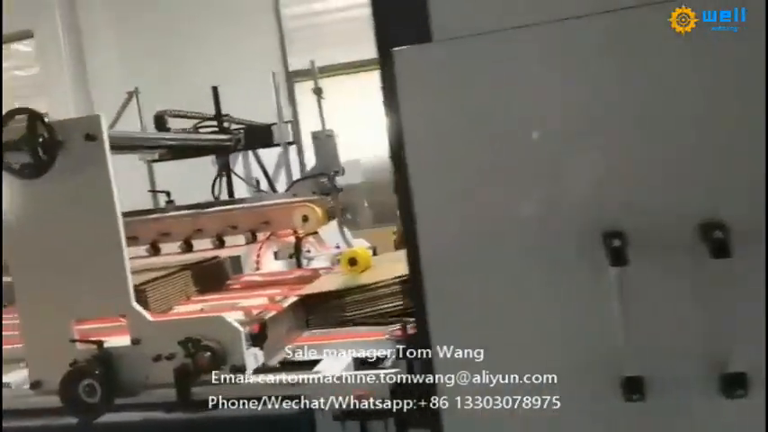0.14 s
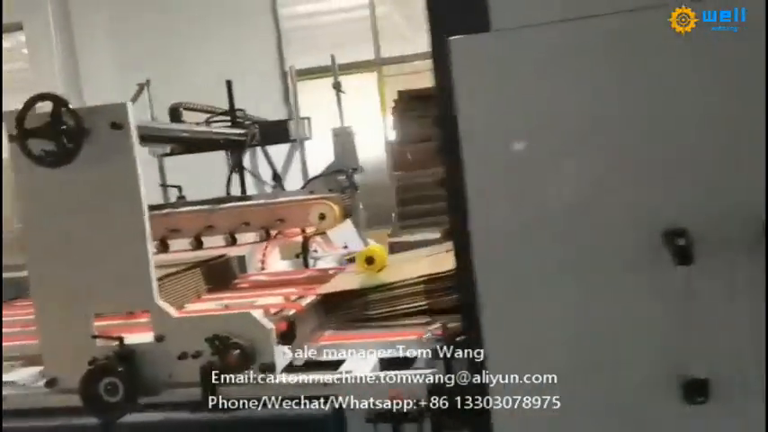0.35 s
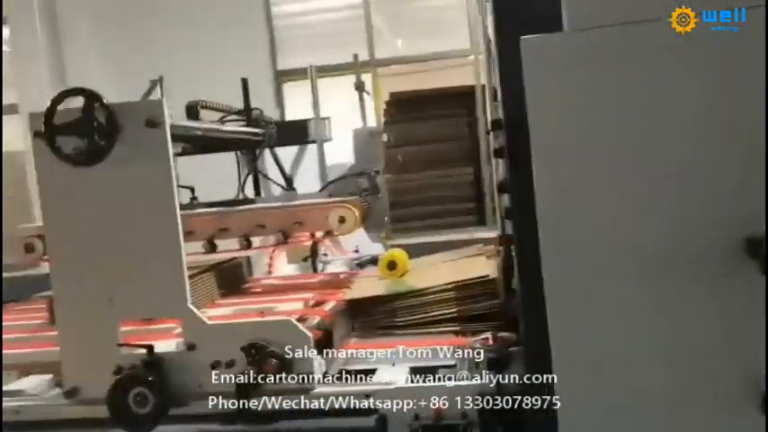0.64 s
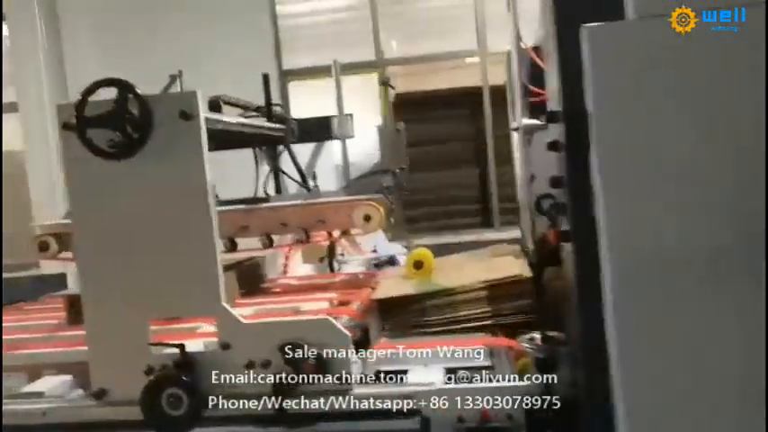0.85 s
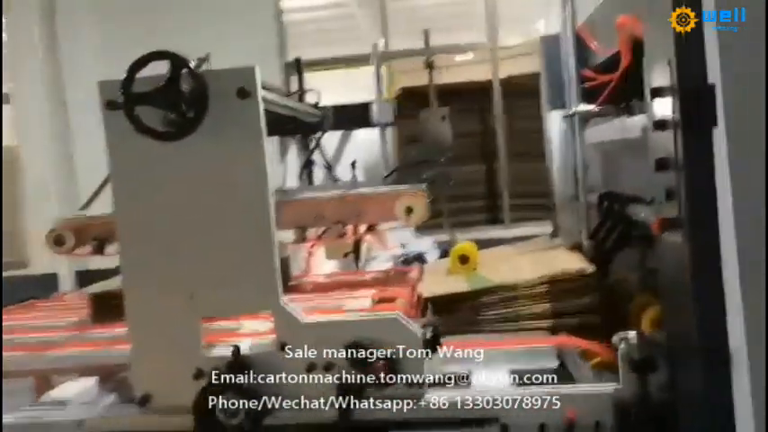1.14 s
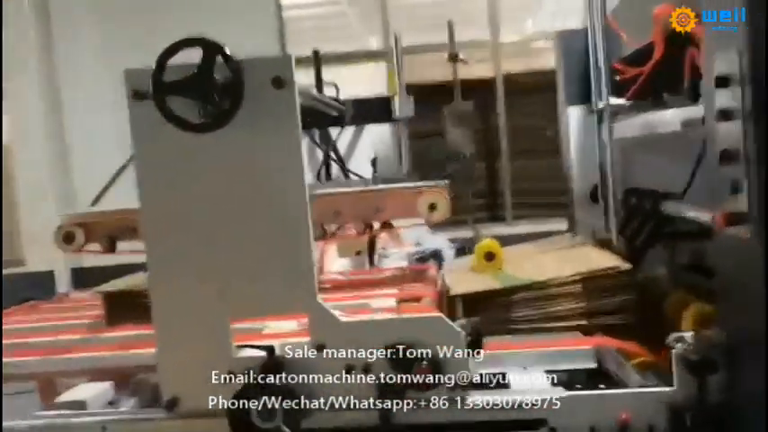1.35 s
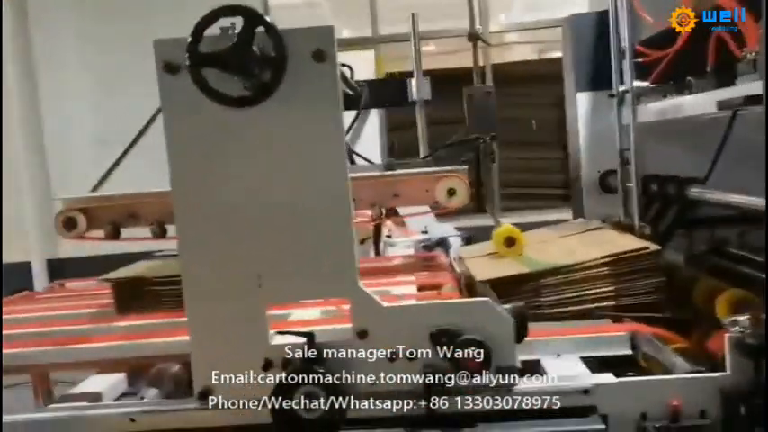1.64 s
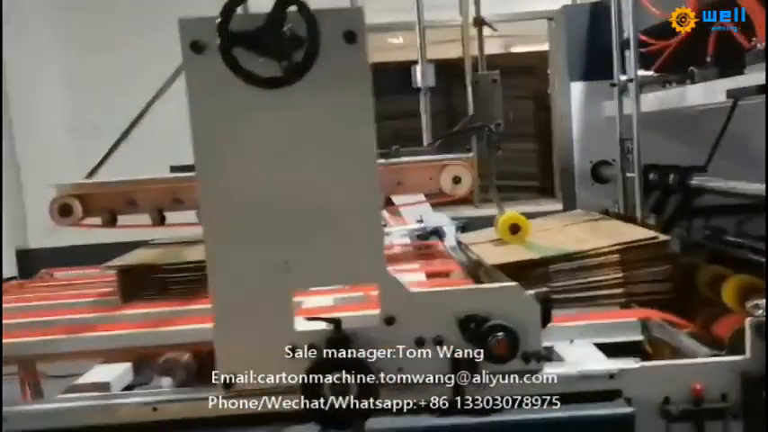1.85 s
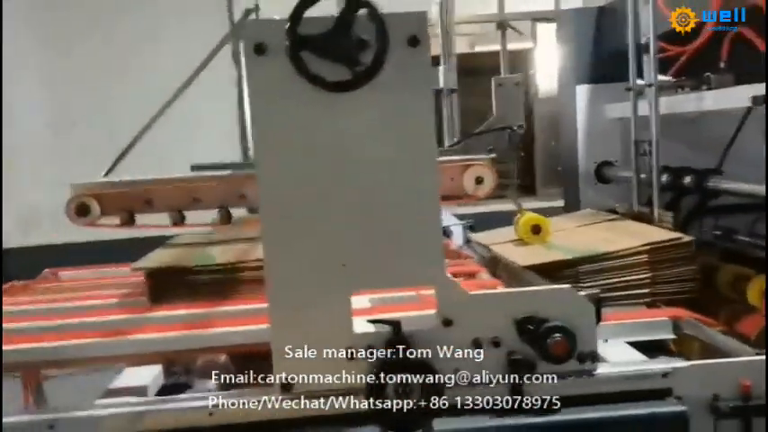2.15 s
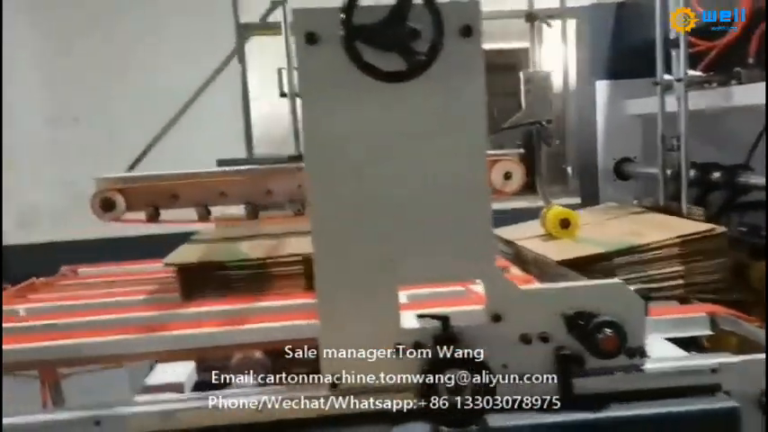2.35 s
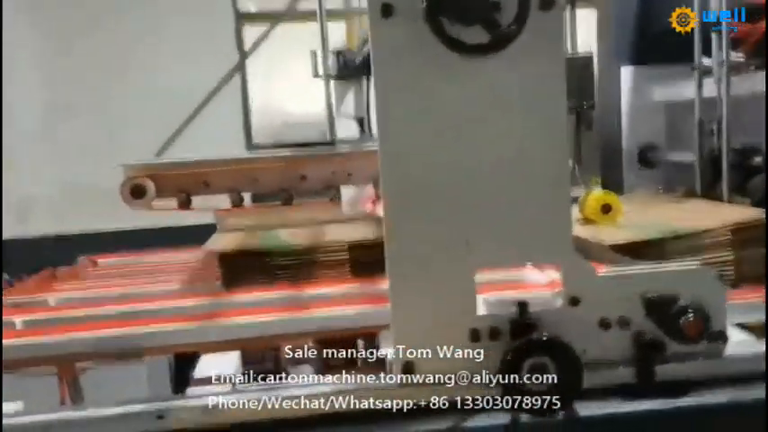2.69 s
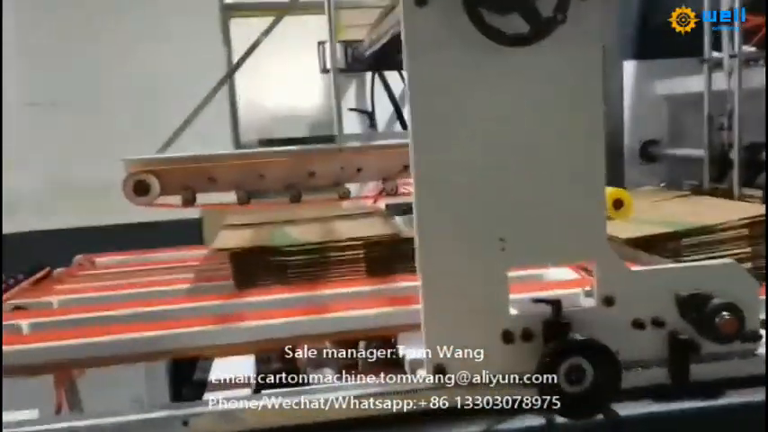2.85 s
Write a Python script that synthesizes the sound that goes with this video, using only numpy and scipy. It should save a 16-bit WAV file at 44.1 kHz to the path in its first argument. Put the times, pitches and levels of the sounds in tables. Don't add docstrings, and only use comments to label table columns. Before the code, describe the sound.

Industrial carton folder clatters rhythmically, catch clacking and pusher scraping, in a reverberant factory hall

```python
import sys
import numpy as np
from scipy import signal
from scipy.fft import rfft, irfft, next_fast_len
from scipy.io import wavfile
from scipy.ndimage import uniform_filter1d, map_coordinates

SR = 44100
rng = np.random.default_rng(int(sys.argv[2]) if len(sys.argv) > 2 else 0)


def unload_wav(signal):
    wavfile.write(
        sys.argv[1],
        SR,
        np.round(np.clip(np.atleast_2d(signal).T, -1, 1) * 32767).astype(np.int16),
    )


def ratio_of_db(decibels):
    return 10 ** (np.asarray(decibels, float) / 20)


N = 133182
LEAD = SR

# t/s at full speed, scrape level/dB, rumble level/dB
STROKES = [
    (-.49, -9.5, -13),
    (0.24, -30, -25.5),
    (0.968, -26, -24.5),
    (1.698, -26.5, -25),
    (2.428, -24.5, -25),
    (3.16, -23, -23.5),
]
# t/s, level/dB, decay t60/s
CATCH_BLOWS = [
    (-.02, -31.5, 0.55),
    (.033, -17.5, 0.088),
    (.7, -17, .12),
    (.727, -29.5, 0.37),
    (1.442, -27.5, 0.91),
    (1.485, -25.5, 0.12),
    (2.155, -22.5, 0.075),
    (2.168, -25, 0.42),
    (2.885, -28.5, 0.7),
    (2.945, -35, 0.13),
]
# f/Hz, density level/dB
STEEL_SPECTRUM = [(710, -47), (1200, -3.5), (1480, -2.5), (4150, -4.5), (7180, -10), (7640, -16.5),
                  (9200, -10.5), (13200, -17), (14200, -13)]
# f/Hz, width/Hz, level/dB over the spectrum
STEEL_MODES = [(2050, 82, -5.5), (3025, 170, -11), (3240, 150, -9.5), (3650, 220, -3.5), (4066, 280, 1.5),
               (6026, 180, -2), (7070, 160, -5)]
# f/Hz, width/Hz, level/dB over the rumble
FRAME_MODES = [(126.4, 37, 2), (230.3, 34, 1.5), (342, 100, -3), (454, 81, -15), (700, 70, 5.5)]


def clock():
    return np.arange(-LEAD, N) / SR


def unit(x):
    return x / np.sqrt(np.mean(x ** 2) + 1e-20)


def along(points, hz):
    f, value = np.transpose(points)
    return np.interp(np.log(hz + 1), np.log(f + 1), value)


def wobble(rate):
    knots = rng.standard_normal(int((N + LEAD) * 60 / SR))
    return map_coordinates(knots, [np.arange(N + LEAD) * min(rate, 55) / SR])


def coloured(x, spectrum, peaks=()):
    m = next_fast_len(len(x) + SR // 4)
    f = np.fft.rfftfreq(m, 1 / SR)
    ring = 1
    for centre, width, db in peaks:
        ring = ring + ratio_of_db(db) * 1j * f * width / (centre * centre - f * f + 1j * f * width)
    shaped = rfft(x, m) * ratio_of_db(along(spectrum, f)) * ring
    return unit(irfft(shaped, m)[:len(x)])


def grains(spiky_db, patchy_db):
    uneven = np.repeat(rng.exponential(1, (N + LEAD) // 40 + 1), 40)[:N + LEAD]
    contacts = ratio_of_db(spiky_db * uneven) * rng.standard_normal(N + LEAD)
    z = signal.stft(contacts, nperseg=512)[2]
    patches = uniform_filter1d(uniform_filter1d(rng.standard_normal(z.shape), 5, 0), 8, 1)
    return signal.istft(z * ratio_of_db(patchy_db * unit(patches)), nperseg=512)[1][:N + LEAD]


def speed(levels, lag, wider):
    speed_up_s, hold_s, slow_down_s = 0.19, 0.067, 0.13
    t = clock() - lag
    total = 0
    for s, db in levels:
        before = np.clip((s - t) / speed_up_s / wider, 0, None)
        after = np.clip((t - s - hold_s) / slow_down_s / wider, 0, None)
        total = total + ratio_of_db(db) * np.exp(-before ** 2) * np.exp(-after ** 2)
    return total


def bursts(rows, rise):
    t = clock()
    total = 0
    for s, db, t60 in rows:
        after = np.clip(t - s, 0, None)
        total = total + ratio_of_db(db - 60 * after / t60) * (1 - np.exp(-after / rise))
    return total


def scrape():
    # t/s, level/dB, rattle t60/s
    slap_rows = [(.11, -22.5, 0.79), (.2, -13, 0.19), (.32, -27, 0.3), (.856, -21.5, 0.11),
                 (.935, -15.5, 0.13), (1.05, -21, 0.087), (1.62, -27, 0.29), (1.66, -26.5, 0.23),
                 (1.742, -32.5, 0.16), (1.991, -25.5, 0.079), (2.405, -18.5, 0.078), (2.49, -49, 0.083)]
    # f/Hz, density level/dB
    board_spectrum = [(530, -47.5), (900, -3.5), (1070, -2.5), (1600, -6.5), (2240, -0.5), (3900, -4.5),
                      (8360, -18.5), (11500, -23.5), (14200, -23.5)]
    strokes = speed([(s, db) for s, db, _ in STROKES], lag=0, wider=1)
    drive = strokes * ratio_of_db(2.0 * wobble(45)) + bursts(slap_rows, rise=0.014)
    return drive * coloured(grains(spiky_db=1.03, patchy_db=2.5), board_spectrum, STEEL_MODES)


def catch():
    rattle = coloured(grains(spiky_db=-2.5, patchy_db=2.0), STEEL_SPECTRUM, STEEL_MODES)
    return bursts(CATCH_BLOWS, rise=0.0021) * ratio_of_db(2.3 * wobble(50)) * rattle


def frame():
    # t/s, level/dB, f/Hz
    boom_rows = [(0.028, -19.5, 235), (0.35, -25, 470), (.19, -24.5, 229), (0.12, -28, 320),
                 (0.18, -24.5, 150), (2.4, -25, 690), (1.78, -26.5, 530), (1.98, -23.5, 480),
                 (.77, -20.5, 240), (2.9, -17, 160), (0.18, -20.5, 170), (.2, -32.5, 880), (.29, -20, 710),
                 (3.5, -28, 910), (2.3, -24.5, 1000), (0.29, -21.5, 238), (.49, -21.5, 120),
                 (0.67, -21.5, 110), (1.5, -36, 300), (.94, -16, 350), (1.0, -28.5, 118), (1.3, -25, 290),
                 (1.269, -25, 120), (1.46, -34, 440), (1.66, -14.5, 220), (1.7, -22, 290), (2.0, -20, 340),
                 (2.5, -27.5, 280), (2.442, -16.5, 250), (2.44, -19.5, 715), (2.6, -19.5, 127),
                 (3.1, -21, 128), (2.95, -18.5, 290)]
    # f/Hz, density level/dB
    rumble_spectrum = [(25, -38), (40, -10.5), (55, -2.5), (120, -4.5), (300, -2.5), (600, -9),
                       (1000, -12.5), (1600, -67)]
    strokes = speed([(s, db) for s, _, db in STROKES], lag=0.014, wider=1.17)
    drive = strokes + bursts(CATCH_BLOWS, rise=0.03)
    booms = 0
    for s, db, hz in boom_rows:
        phase = 2 * np.pi * hz * clock() + 2.4 * wobble(18)
        booms = booms + bursts([(s, db + 2.5, 0.25)], rise=0.012) * np.sin(phase)
    rumble = coloured(grains(spiky_db=0.2, patchy_db=2.5), rumble_spectrum, FRAME_MODES)
    return booms + drive * ratio_of_db(1.3 * wobble(14)) * rumble


def motor():
    # t/s, level/dB
    hum_levels = [(0, -29), (.23, -25), (.33, -29), (.38, -39), (.43, -32), (.5, -42), (.62, -52),
                  (.74, -33), (.8, -39), (.86, -26), (.91, -25), (.96, -42), (1.08, -37), (1.2, -32),
                  (1.32, -46), (1.74, -46), (1.81, -26), (1.89, -46), (1.99, -33), (2.07, -50), (2.42, -46),
                  (2.5, -28), (2.55, -26), (2.6, -33), (2.71, -25), (2.79, -32), (3.02, -28)]
    hum_hz = 496.8
    s, db = np.transpose(hum_levels)
    phase = 2 * np.pi * hum_hz * clock() + 0.6 * wobble(10) + 0.6 * wobble(45)
    level_db = np.interp(clock(), s, db) + 2.2 * wobble(30)
    return np.sqrt(2) * ratio_of_db(level_db) * np.sin(phase)


def floor():
    # f/Hz, density level/dB
    floor_spectrum = [(25, -19), (55, -12), (250, -4.5), (600, -8.5), (1450, -17), (4000, -19.5),
                      (5500, -26.5), (14200, -39.5)]
    steady = grains(spiky_db=0.5, patchy_db=0.8)
    return ratio_of_db(-32.5 + 0.22 * wobble(3.52)) * coloured(steady, floor_spectrum, FRAME_MODES[:2])


def knocks():
    # t/s, peak level/dB, decay t60/s
    knock_rows = [(0.031, -9, 0.075), (0.099, -11.5, 0.06), (0.1356, -15, 0.044), (0.2047, -5, 0.086),
                  (0.2194, -7, 0.088), (0.2932, -11.5, 0.085), (0.3178, -7.5, 0.07), (0.378, -13.5, 0.086),
                  (0.701, -20, 0.078), (0.7164, -12, 0.049), (0.7294, -18, 0.097), (0.855, -11.5, 0.061),
                  (0.9375, -9, 0.08), (0.963, -9, 0.076), (1.037, -15, 0.051), (1.054, -10, 0.07),
                  (1.4436, -22, 0.07), (1.457, -14.5, 0.14), (1.618, -18, 0.083), (1.698, -15, 0.07),
                  (1.7415, -13.5, 0.07), (1.8173, -13.5, 0.058), (1.99, -19, 0.056), (2.1555, -20.5, 0.061),
                  (2.1694, -19, 0.089), (2.173, -13, 0.088), (2.3117, -16, 0.059), (2.6038, -13, 0.062),
                  (2.729, -18.5, 0.056), (2.889, -10, 0.08)]
    steel = coloured(grains(spiky_db=1.9, patchy_db=2.5), STEEL_SPECTRUM)
    return ratio_of_db(-12.5) * bursts(knock_rows, rise=0.0012) * steel


def hall(x):
    # f/Hz, t60/s
    decay_times = [(100, 1.65), (500, 1.05), (3000, 1.03), (8000, 0.77), (14000, 1.44)]
    hz, t, z = signal.stft(rng.standard_normal(3 * SR // 2), SR, nperseg=256)
    decay_db = -60 * t / along(decay_times, hz)[:, None]
    tail = signal.istft(z * ratio_of_db(decay_db), SR, nperseg=256)[1]
    delayed = np.pad(x, (500, 0))
    return signal.fftconvolve(delayed, tail / np.linalg.norm(tail))[:len(x)]


def thinned(x):
    # f/Hz, step over the band level/dB
    coarseness = [(2000, -12), (4000, -2), (5200, 4.5), (7000, 7.5), (9000, 9.3), (12000, 9), (13500, 9.3),
                  (13900, 16)]
    step_follows, frame_scatter_db, step_scatter_db = 0.87, 1.2, 3
    attack_db, top_hz = 10.8, 14300
    window = signal.windows.kaiser_bessel_derived(2048, 4 * np.pi)
    f, _, z = signal.stft(np.pad(x, (200, 0)), SR, window, 2048)
    band = np.minimum(np.arange(len(f)) // 32, 31)
    power = np.mean(abs(z[:-1].reshape(32, 32, -1)) ** 2, 1)
    level_db = 10 * np.log10(power + 1e-20)
    step_db = step_follows * level_db + (1 - step_follows) * level_db.mean(1, keepdims=True)
    step_db = step_db + frame_scatter_db * rng.standard_normal(step_db.shape[1])
    scatter = unit(uniform_filter1d(rng.standard_normal(step_db.shape), size=2))
    step_db = step_db + step_scatter_db * scatter
    step = ratio_of_db(step_db[band] + along(coarseness, f)[:, None])
    treble_db = level_db[6:18].mean(0)
    attack = treble_db - np.roll(treble_db, 1) > attack_db
    passes = attack | np.roll(attack, -1)
    rounded = np.round(abs(z) / step) * step * z / (abs(z) + 1e-20)
    kept = np.where(passes, z, rounded) * (f < top_hz)[:, None]
    return signal.istft(kept, SR, window, 2048)[1][200:][:N]


def scene():
    machine = ratio_of_db(-1.0) * (scrape() + catch() + frame())
    far = motor() + floor()
    near = knocks()
    reverberant = ratio_of_db(-1) * hall(machine + ratio_of_db(-2) * near)
    return (machine + near + reverberant + far)[None, LEAD:]


def top_cut(x):
    return signal.sosfilt(signal.butter(12, 14360, fs=SR, output="sos"), x)


def record(dry):
    mix = thinned(dry[0])[None]
    return top_cut(mix)


dry = scene()
out = record(dry)
unload_wav(out)
```